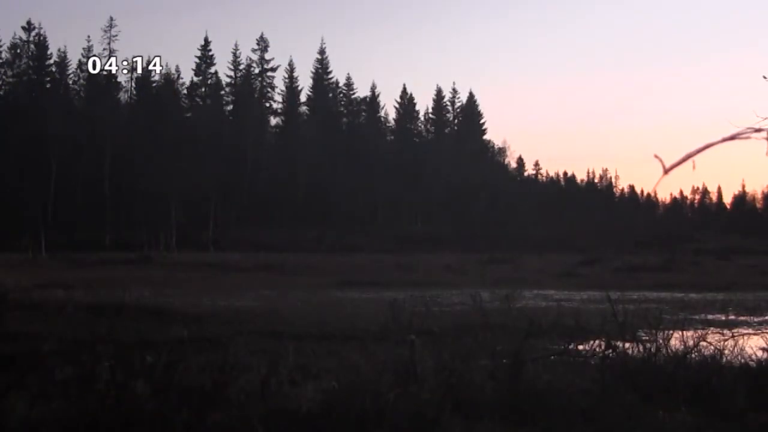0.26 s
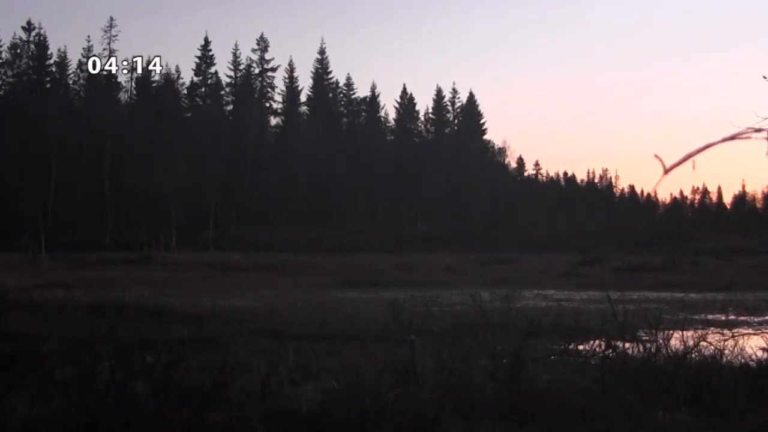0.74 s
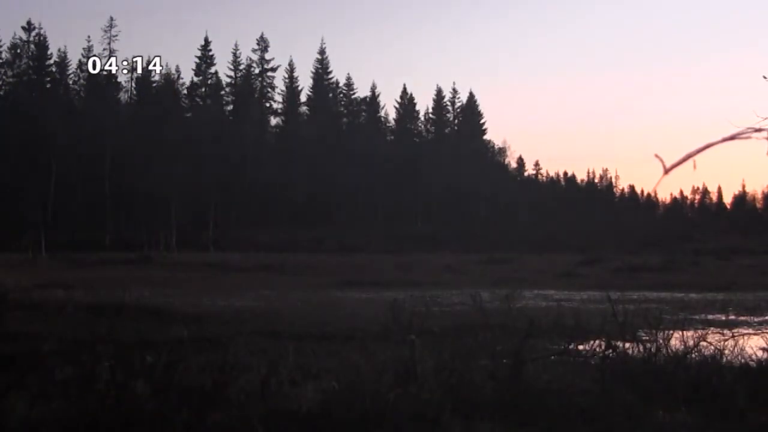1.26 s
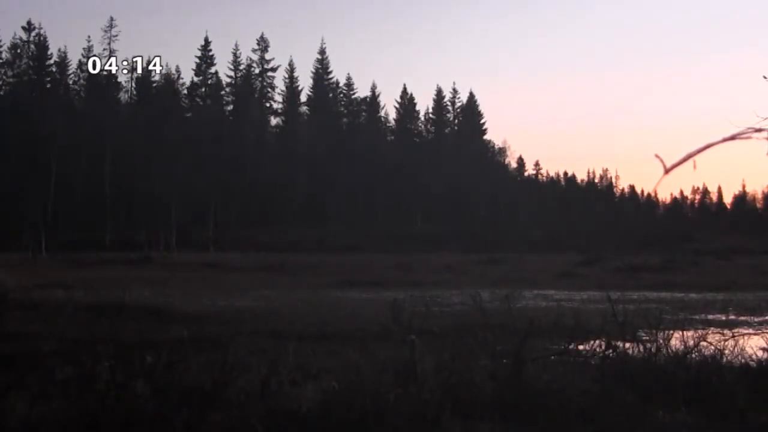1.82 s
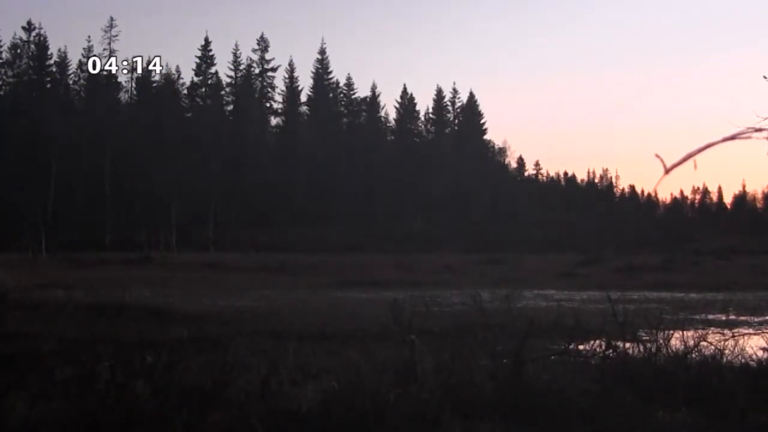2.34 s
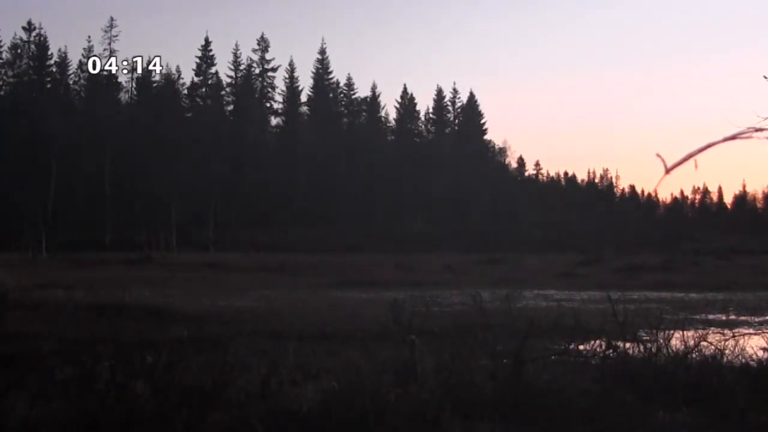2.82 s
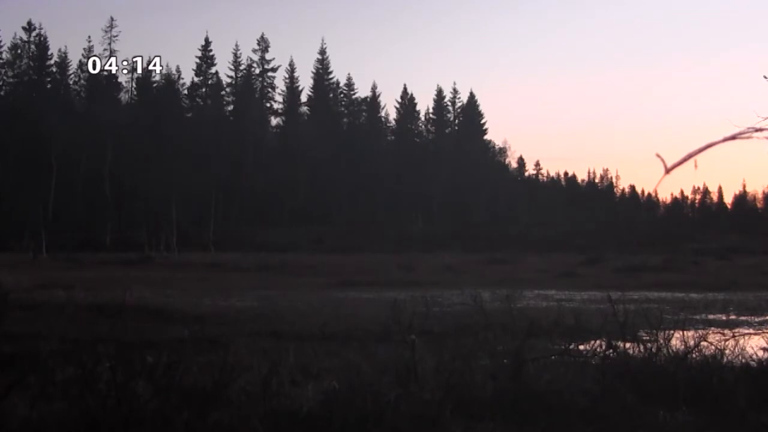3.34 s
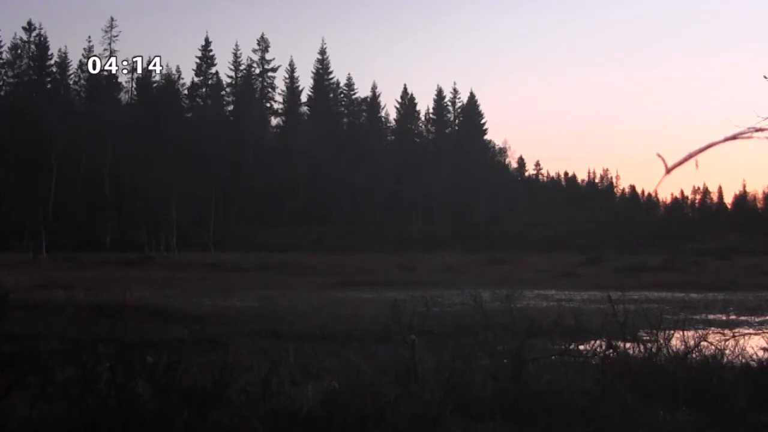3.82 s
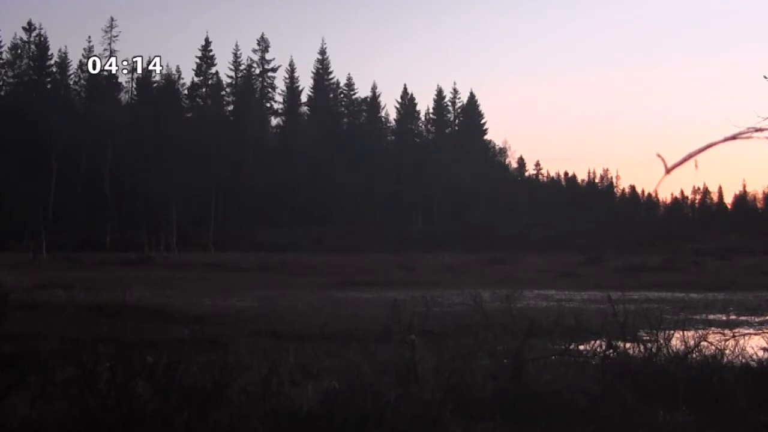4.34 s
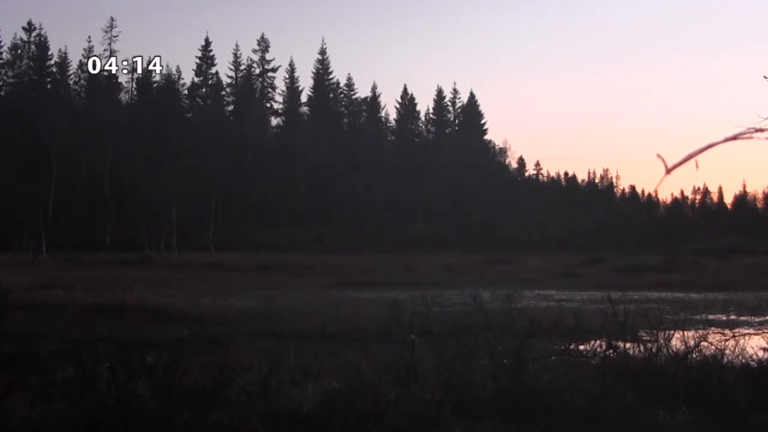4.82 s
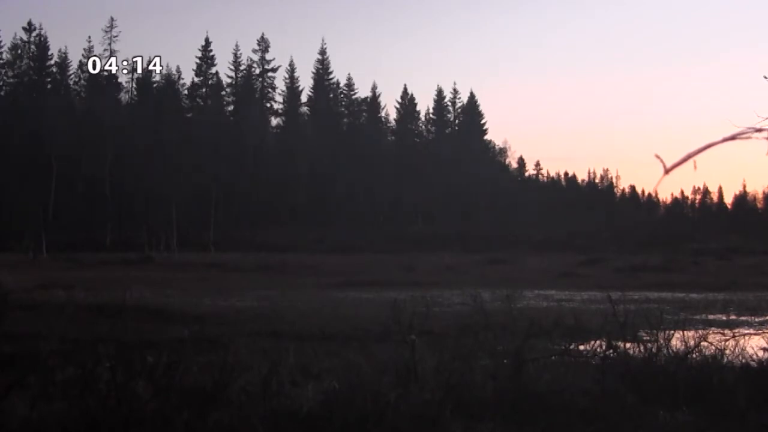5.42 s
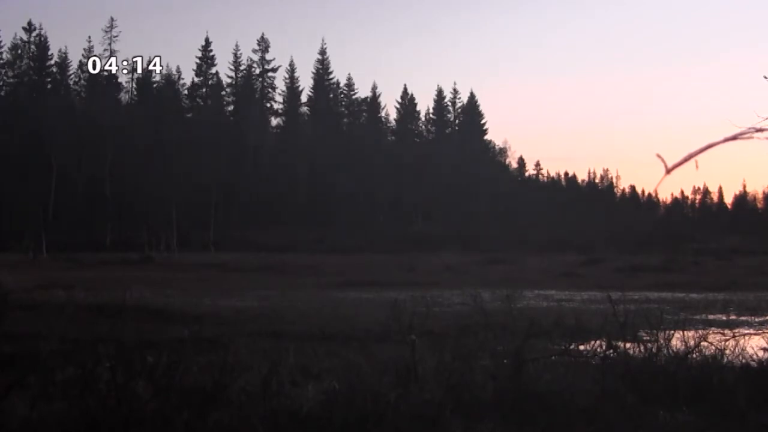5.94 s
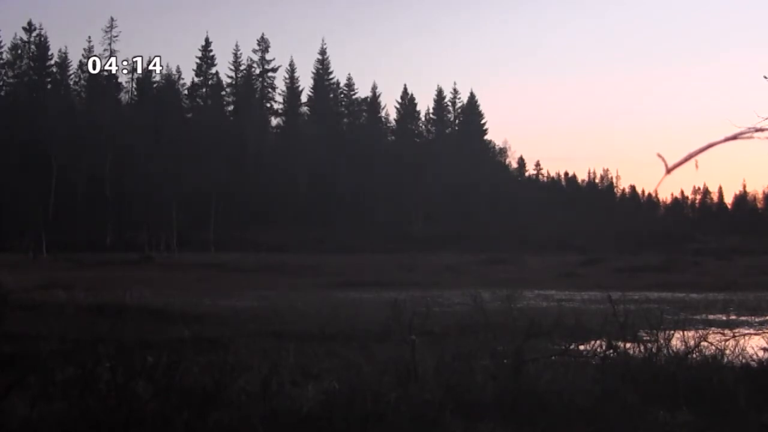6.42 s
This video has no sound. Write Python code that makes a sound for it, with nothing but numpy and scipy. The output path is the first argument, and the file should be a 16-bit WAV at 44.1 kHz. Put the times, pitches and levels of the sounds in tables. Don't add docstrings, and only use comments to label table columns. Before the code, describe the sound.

Many birds call over an open bog at daybreak, with clear whistles, faint low bubbling coos, one airy hiss, sharp chatter and late hoarse croaks.

```python
import sys
import numpy as np
from scipy import signal
from scipy.io import wavfile
from scipy.ndimage import uniform_filter1d

SR = 44100
rng = np.random.default_rng(int(sys.argv[2]) if len(sys.argv) > 2 else 0)


def int16_out(signal):
    q = np.round(np.clip(np.atleast_2d(signal).T, -1, 1) * 32767)
    wavfile.write(sys.argv[1], SR, q.astype(np.int16))


def nominal_scale(level):
    x = np.asarray(level, float) / 20
    return 10 ** x


N = 294147

# pitch in Hz, time to fall by 60 dB in seconds.
ECHO_TIMES = [(500, 1.8), (2000, 1.32), (4000, 0.91), (8000, 1.1)]


def evened(x):
    return x / np.sqrt(np.mean(x ** 2) + 1e-20)


def read(points, hz):
    f, value = np.transpose(points)
    return np.interp(np.log(hz + 1), np.log(f + 1), value)


def add(mix, s, sound, pan_db=0., lag=0.):
    for ch, sign in enumerate((1, -1)):
        at = s * SR + sign * lag / 2
        first = int(np.floor(at))
        between_samples = np.sinc(np.arange(-8, 9) - (at - first)) * np.hanning(17)
        shifted = np.convolve(sound, between_samples)[max(8 - first, 0):]
        same_power = np.sqrt(np.cosh(pan_db * np.log(10) / 20))
        shifted = shifted * nominal_scale(sign * pan_db / 2) / same_power
        part = mix[ch, max(first - 8, 0):][:len(shifted)]
        part += shifted[:len(part)]


def resonate(x, hz, width):
    turn = np.exp(2j * np.pi * np.cumsum(hz * np.ones(len(x))) / SR)
    r = np.exp(-np.pi * width / SR)
    return 2 * (turn * signal.lfilter([(1 - r) ** 2], [1, -2 * r, r * r], x / turn)).real


def drift(size, span):
    noise = rng.standard_normal(size + 2 * span)
    return evened(uniform_filter1d(uniform_filter1d(noise, span), span))[:size]


def tone(hz, level_db, fade):
    wave = np.sin(2 * np.pi * np.cumsum(hz) / SR)
    return np.sqrt(2) * nominal_scale(level_db) * wave * signal.windows.tukey(len(hz), fade)


def whistles(mix):
    # start in seconds, length in seconds, first Hz, goal Hz, top level in dB, pitch and level shape.
    left_notes = [(0.0, .135, 1604, 1866, -32.5, "settle early"),
                  (0.259, 0.011, 1910, 2610, -28.5, "glide swell"),
                  (0.296, 0.0091, 2650, 1950, -30, "glide bloom"),
                  (0.431, 0.0131, 3950, 2545, -31, "hook bloom"),
                  (0.607, 0.085, 3680, 3030, -39.5, "ease crest"),
                  (0.688, 0.185, 2930, 3090, -37.5, "ease early trill"),
                  (3.882, .11, 1968, 1870, -37, "sweep bloom"),
                  (4.542, 0.11, 1570, 1693, -39.5, "settle early"),
                  (6.081, 0.092, 1920, 1875, -31, "glide fade"),
                  (6.337, 0.11, 1672, 1540, -39.5, "glide even"),
                  (6.446, 0.12, 2004, 2130, -41.5, "sweep swell"),
                  (6.534, 0.062, 2760, 2720, -40, "glide even"),
                  (6.173, 0.13, 2056, 2110, -42, "glide even trill"),
                  (6.53, .08, 2128, 2150, -38.5, "glide fade")]
    right_notes = [(.283, 0.021, 3900, 2820, -26.5, "hook bloom"),
                   (0.307, 0.039, 2930, 3360, -33.5, "vault fade"),
                   (0.488, 0.087, 1865, 1448, -42.5, "glide fade"),
                   (.553, 0.083, 1457, 1905, -31.5, "settle crest"),
                   (0.641, 0.04, 1943, 1800, -34, "glide fade trill"),
                   (.63, 0.091, 1570, 1490, -53, "glide even"),
                   (.862, 0.14, 2460, 2182, -30.5, "rise late"),
                   (0.868, 0.12, 2740, 2900, -30.5, "arch crest"),
                   (1.257, .025, 2172, 1875, -29.5, "glide swell"),
                   (1.285, .085, 1860, 1950, -41, "glide even trill"),
                   (1.318, 0.062, 2620, 2505, -39, "glide bloom"),
                   (1.37, 0.087, 2026, 1979, -26, "arch even"), (1.499, .14, 2420, 2874, -27, "rise bloom"),
                   (2.387, 0.021, 3900, 2750, -27.5, "glide swell"),
                   (2.415, 0.052, 3365, 2990, -32.5, "hook early"),
                   (2.513, 0.1, 2200, 2946, -26, "ease swell"),
                   (3.69, 0.093, 2510, 2990, -29.5, "glide late"),
                   (2.611, 0.0073, 2940, 2400, -37, "glide fade"),
                   (3.662, 0.05, 2700, 2680, -43, "glide even trill"),
                   (4.764, 0.042, 2886, 3110, -37, "vault bloom"),
                   (4.77, .11, 2366, 1677, -36.5, "glide even"),
                   (5.55, 0.12, 1848, 1807, -40.5, "glide bloom"),
                   (5.635, 0.09, 1470, 1930, -40.5, "sweep swell")]
    ahead_notes = [(1.742, 0.11, 1497, 1935, -36.5, "hook even trill"),
                   (1.9, 0.19, 2100, 2123, -34.5, "arch even trill"),
                   (1.855, 0.047, 1854, 2090, -36.5, "glide swell"),
                   (1.875, 0.227, 2470, 2396, -41, "glide even trill"),
                   (1.985, 0.052, 2134, 1480, -31, "ease snap"),
                   (2.116, 0.11, 2905, 2787, -24.5, "settle even"),
                   (2.279, 0.078, 2750, 2770, -33.5, "glide even"),
                   (2.316, 0.069, 2490, 2500, -29.5, "glide swell"),
                   (2.699, 0.0096, 3960, 4400, -28, "ease swell"),
                   (2.707, 0.035, 4400, 3130, -33, "ease even"),
                   (2.742, 0.3, 3110, 4344, -32.5, "vault even"),
                   (3.255, 0.235, 2410, 2300, -44, "droop early"),
                   (3.478, 0.172, 2260, 3510, -33.5, "curl swell"),
                   (3.565, 0.086, 4480, 3094, -37.5, "hook bloom"),
                   (3.57, 0.16, 2030, 2133, -41.5, "vault swell trill"),
                   (3.553, 0.028, 3800, 2437, -38, "glide crest"),
                   (3.592, 0.028, 4200, 4030, -43, "hook even"),
                   (3.697, .045, 4300, 4010, -44.5, "ease bloom"),
                   (3.87, 0.016, 4340, 4330, -38.5, "glide even"),
                   (3.982, 0.085, 4010, 4250, -35.5, "ease bloom"),
                    (4.062, 0.115, 4250, 3830, -34.5, "rise even"),
                    (4.0, .04, 4100, 3700, -36, "rise fade"), (4.144, .024, 4780, 4290, -36.5, "ease even"),
                    (4.165, 0.11, 4290, 3930, -34, "rise early"),
                    (4.1, .022, 4800, 4450, -43, "glide even"),
                    (4.955, 0.082, 2360, 2020, -40, "droop even"),
                    (4.89, .06, 2440, 2300, -39, "droop swell"),
                    (4.8, 0.12, 2300, 2360, -43, "glide even trill"),
                    (5.46, 0.087, 2520, 2560, -45, "glide even trill"),
                    (.946, 0.053, 4420, 4400, -44, "glide fade"),
                    (5.018, 0.055, 2520, 2400, -41, "glide swell"),
                    (5.09, 0.205, 2167, 2077, -37, "ease fade"),
                    (5.095, .045, 3300, 4500, -41, "glide crest"),
                    (5.37, 0.085, 2620, 2380, -39.5, "sweep late"),
                    (5.29, .23, 2090, 2080, -47.5, "glide even"),
                    (5.625, .065, 2340, 2190, -44, "ease even"), (5.51, .05, 1880, 1850, -46, "glide even"),
                    (5.06, .09, 1760, 1740, -48, "glide even")]
    # left-right level in dB, left delay in samples.
    places = [(13.5, 2.5), (-15, 0), (-3, -3.5)]
    pitch_shapes = {"glide": (1, 1, 0), "ease": (1, 1.9, 0), "sweep": (1, .7, 0), "settle": (.3, 1.5, .05),
                    "hook": (.45, 1.4, .3), "vault": (.48, 2.1, .62), "arch": (.5, 2, 1.1),
                    "curl": (.76, 1.2, .25), "droop": (1, .35, 0), "rise": (1, .5, 0)}
    level_shapes = {"swell": (0.86, -13.5, -.3), "bloom": (0.34, -10.5, -0.6), "crest": (0.38, -14, -4),
                    "early": (0.16, -6.5, -1.5), "even": (0.43, -4, -3), "fade": (0.038, -.3, -11),
                    "late": (0.6, -12, -8), "snap": (0.013, -.3, -16.5)}
    trill_per_s, trill_swing, trill_db = 46, .025, 1.5

    for notes, (pan_db, lag) in zip((left_notes, right_notes, ahead_notes), places):
        for s, length, hz0, hz1, db, shape in notes:
            turn, bend, back = pitch_shapes[shape.split()[0]]
            top, db0, db1 = level_shapes[shape.split()[1]]
            u = np.linspace(0, 1, int(length * SR), endpoint=False)
            going = 1 - np.maximum(1 - u / turn, 0) ** bend
            returning = back * (np.maximum(u - turn, 0) / (1.001 - turn)) ** bend
            level_db = db + np.interp(u, [0, top, 1], [db0, 0, db1])
            far = np.clip((-28 - level_db) / 12, .2, 1)
            pitch = hz0 + (hz1 - hz0) * (going - returning)
            pitch = pitch * (1 + .008 * far * drift(len(u), 170))

            beat = np.cos(2 * np.pi * trill_per_s * length * u + 1.14 * drift(len(u), 900))
            beat = beat * ("trill" in shape) * np.minimum(4 * u, 1)
            pitch = pitch * (1 + trill_swing * beat)
            flutter_db = 3.0 * far * drift(len(u), 230)
            level_db = level_db + trill_db * beat + flutter_db

            fade_s = .003 + 0.013 * np.clip((-31.5 - db) / 10, 0, 1) * min(length / .1, 1)
            add(mix, s, tone(pitch, level_db, min(fade_s / length, 1)), pan_db, lag)


def bubbles(rows, start=0., gain_db=0.):
    bends = {"sink": (1.04, .96, .77), "drop": (1.11, 1, .79), "arch": (.88, 1, .8), "pip": (.88, 1, 1.08),
             "coo": (.97, 1, 1.01)}
    out = np.zeros((2, N))
    for s, length, hz, db, shape in rows:
        u = np.linspace(0, 1, int(length * 1.2 * SR))
        pitch = hz * np.polyval(np.polyfit([0, .5, 1], bends[shape], 2), u)
        level_db = db + gain_db + 1.5 * drift(len(u), 300)
        add(out, start + s - length / 8, tone(pitch, level_db, .7))
    return out[0]


def falling(rows):
    return [(*row, "sink") for row in rows]


def near_cock():
    # start within the phrase in seconds, length in seconds, pitch in Hz, level in dB, shape.
    phrase = [(0, .065, 670, -56, "arch"), (.128, 0.051, 651, -52, "drop"), (.24, 0.076, 662, -53, "arch"),
              (.33, 0.061, 597, -52, "arch"), (.41, 0.057, 662, -52, "arch"),
              (.46, 0.098, 629, -55.5, "coo"), (.545, 0.041, 592, -51, "drop"),
              (.65, .041, 645, -59, "sink"), (.68, 0.038, 558, -57.5, "pip"),
              (.74, 0.016, 630, -51.5, "pip"), (.765, 0.033, 606, -49.5, "drop"),
              (.835, 0.028, 648, -50.5, "drop"), (.915, 0.071, 634, -49.5, "sink"),
              (1.0, 0.049, 598, -50.5, "arch"), (1.055, 0.013, 640, -50.5, "pip"),
              (1.08, .045, 632, -49, "drop"), (1.19, 0.039, 583, -59, "arch"),
              (1.24, 0.028, 647, -61, "arch"), (1.275, 0.027, 640, -55, "sink"),
              (1.31, .038, 600, -65, "sink")]
    # start in seconds, level change in dB.
    phrase_starts = [
        (-.16, 1.5),
        (4.295, -1.5),
    ]
    # start in seconds, length in seconds, top pitch in Hz, level in dB.
    loose = [(3.62, 0.07, 587, -57.5), (3.71, 0.05, 574, -56.5), (3.78, 0.032, 613, -55.5),
             (3.835, 0.051, 615, -52.5), (3.905, 0.0608, 629, -50.5), (3.975, .045, 678, -53),
             (4.04, 0.033, 690, -54.5)]
    sound = bubbles(falling(loose)) + sum(bubbles(phrase, s, db) for s, db in phrase_starts)
    return sound * np.array([[1.4], [-.28]])


def forest_edge(x):
    taps = np.zeros((2, SR))
    at = np.arange(400, SR - 20, 20) + rng.integers(0, 20, (2, (SR - 401) // 20))
    np.put_along_axis(taps, at, rng.choice([-1., 1.], at.shape), 1)
    hz, t, z = signal.stft(taps, SR, nperseg=256)
    dying = nominal_scale(-60 * t / read(ECHO_TIMES, hz)[:, None])
    tail = signal.istft(z * dying, SR, nperseg=256)[1]
    tail[1] += 0.37 * tail[0]
    tail = tail / np.linalg.norm(tail, axis=1, keepdims=True)
    return signal.fftconvolve(x[None], tail, axes=1)[:, :N]


def blurs():
    # start in seconds, length in seconds, pitch in Hz, level in dB.
    thin_calls = [(.93, 0.026, 4630, -48.5), (1.218, 0.039, 4020, -44), (1.59, 0.03, 3400, -45),
                  (1.92, 0.2, 5240, -55.5), (1.987, 0.071, 4420, -50.5), (3.03, 0.16, 4330, -44),
                  (3.105, 0.16, 1915, -49), (3.15, 0.37, 3460, -45.5), (0.27, 0.29, 2320, -44.5),
                  (0.091, 0.06, 6500, -54.5), (0.074, .08, 7600, -57), (0.8, .17, 10800, -63),
                  (3.36, 0.074, 7200, -58), (2.85, 0.24, 10700, -62), (4.995, 0.05, 4300, -46),
                  (5.08, 0.068, 1810, -49), (6.61, .06, 5000, -49), (0.99, 0.091, 5100, -56),
                  (5.77, 0.081, 5270, -53), (4.2, .017, 4150, -47.5), (3.63, 0.42, 2700, -47.5),
                  (4.089, 0.036, 4570, -46.5), (4.804, 0.046, 3400, -45.5), (5.395, 0.076, 2410, -41.5),
                  (2.85, .25, 5200, -53), (5.5, .06, 5500, -55), (3.9, .1, 3400, -47),
                  (6.187, 0.074, 4040, -43.5), (6.412, 0.16, 4250, -45.5)]
    harsh_calls = [(6.1, 0.21, 1400, -49.5), (1.25, .3, 4900, -55.5), (4.45, .3, 1300, -54),
                   (0.199, 0.18, 3200, -45.5), (1.15, 0.51, 2820, -46.5), (1.992, 0.016, 2700, -39.5),
                   (2.3, 0.43, 2820, -40), (2.737, .29, 3240, -37), (4.071, 0.23, 1200, -53.5),
                   (4.995, 0.03, 3700, -39.5), (5.9, 0.17, 3500, -41.5), (6.52, 0.077, 3100, -41.5)]
    # start in seconds, length in seconds, level in dB.
    hisses = [
        (2.173, 0.47, -33.5),
        (4.432, 0.21, -42),
        (5.936, 0.27, -46.5),
    ]
    # pitch in Hz, half width in Hz, level in dB.
    mouth = [(5110, 1020, 0), (7050, 895, -13), (9330, 915, -18.5), (3650, 705, -8), (1650, 480, -9.5),
             (5300, 260, -7)]
    thin_width, harsh_width = 0.056, 0.23
    gape_from, gape_for = 0.15, 0.63

    rows = [(s, n, hz, hz * thin_width, db) for s, n, hz, db in thin_calls]
    rows += [(s, n, hz, hz * harsh_width, db) for s, n, hz, db in harsh_calls]
    for s, n, db in hisses:
        for k, (hz, width, gain_db) in enumerate(mouth):
            side = k > 0
            rows.append((s + side * gape_from * n, n * gape_for ** side, hz, width, db + gain_db))
    return rows


def background():
    # time in seconds, level in dB.
    murmur = [(0, -51), (1.0, -57), (2.5, -51), (3.0, -58), (3.5, -62.5), (4.0, -76), (4.3, -63),
              (5.0, -58.5), (5.7, -62), (6.1, -55), (6.67, -59)]
    forest_song = [(0, -37.5), (1.0, -41.5), (1.3, -41), (2.1, -36.5), (2.5, -35), (3.0, -70), (3.9, -59),
                   (4.5, -35), (4.999, -44), (5.7, -38.5), (6.1, -42.5), (6.67, -35.5)]
    thin_song = [(0, -43), (1.0, -46), (2.0, -48), (3.3, -47.5), (4.2, -44.5), (5.1, -41), (5.4, -57),
                 (5.8, -46.5), (6.1, -45.5), (6.67, -47.5)]
    rustle = [(1.0, -61), (1.3, -54), (3.0, -54.5), (3.9, -61), (4.5, -71), (5.1, -57), (5.7, -56.5),
              (6.67, -49)]
    # pitch in Hz, half width in Hz.
    source_bands = [(1150, 275), (2050, 336), (3150, 530), (14300, 1200)]
    # pitch in Hz, level in dB.
    noise_color = [(60, -68), (200, -50.5), (300, -12.5), (420, -37.5), (520, -7), (900, -5), (2000, -10.5),
                   (5000, -5.5), (8000, -7.5), (16000, -11.5)]
    noise_db = -51
    # pitch in Hz, likeness of left and right (1 is equal).
    likeness = [(200, 0.076), (1000, 0.31), (2400, 0.9), (4400, 0.27), (6500, 0.24), (9000, 0.21),
                (15000, -0.067)]

    frames, hz = N // 128 + 5, np.fft.rfftfreq(512, 1 / SR)
    t = np.arange(frames) * 128 / SR
    a, b, c, d, patches = rng.standard_normal((frames, 257, 5)).T
    patches = evened(uniform_filter1d(uniform_filter1d(patches, 3, 0), 30, 1))

    bands = list(source_bands)
    levels = []
    for curve in (murmur, forest_song, thin_song, rustle):
        levels.append(nominal_scale(np.interp(t, *np.transpose(curve)) - 3.0))
    for s, length, f, width, db in blurs():
        swell = np.clip((t - s) / (0.0067 + 0.25 * length), 0, 1)
        dying_db = 60 * np.maximum(t - s - length, 0) / (1.32 * read(ECHO_TIMES, f))
        levels.append(swell * nominal_scale(db - dying_db))
        bands.append((f, width))

    shapes = [np.exp(-abs((hz - f) / w) ** 2.3) for f, w in bands]
    power = sum(np.outer(g / g.sum(), level ** 2) for g, level in zip(shapes, levels))
    power = power * nominal_scale(2 * 2.2 * patches)
    floor = nominal_scale(2 * read(noise_color, hz))
    power += (nominal_scale(2 * noise_db) * floor / floor.sum())[:, None] * nominal_scale(2 * 0.84 * patches)

    same = np.clip(read(likeness, hz), -1, 1)[:, None]
    late = np.exp(-2j * np.pi * hz * 3.1 / SR)[:, None]
    left = a + 1j * b
    right = same * late * left + np.sqrt(1 - same ** 2) * (c + 1j * d)
    z = np.array([left, right]) * np.sqrt(power)
    return 0.98 * signal.istft(z, nperseg=512, noverlap=384)[1][:, :N]


def chips(mix):
    # start in seconds, length in seconds, first Hz, last Hz, level in dB.
    chip_notes = [(.219, .01, 2750, 3450, -41), (.228, .005, 3400, 2900, -37),
                  (.232, .008, 2850, 3400, -35), (.238, .008, 3400, 3900, -44),
                  (.255, .01, 3300, 3100, -41), (.406, .01, 2690, 3100, -38), (.443, .006, 2600, 2100, -38),
                  (.452, .012, 2900, 2950, -40), (.475, .01, 2850, 2600, -40), (.79, .012, 2750, 2500, -39),
                  (.8, .012, 2300, 2600, -37), (1.455, .012, 3000, 3200, -42),
                  (1.615, .015, 3400, 3200, -40), (2.024, .018, 2800, 3280, -37),
                  (2.305, .015, 2000, 1980, -33), (2.378, .008, 2800, 3350, -37),
                  (3.896, .02, 3250, 3330, -39), (3.478, .016, 2300, 2280, -40),
                  (4.058, .034, 2660, 2200, -44), (5.025, .012, 3000, 3100, -40),
                  (5.675, .07, 2150, 2330, -37.5), (6.148, .013, 3500, 2580, -42),
                  (6.204, .01, 3200, 2600, -42), (6.305, .01, 3400, 2700, -42),
                  (6.31, .012, 4100, 3800, -45), (6.253, .012, 3450, 2750, -42)]
    for s, length, hz0, hz1, db in chip_notes:
        pitch = np.linspace(hz0, hz1, int(length * SR))
        rough = 1 + 0.029 * drift(len(pitch), 60)
        add(mix, s, tone(pitch * rough, db, 0.27), -4, -2.0)


def warbles(mix):
    # start in seconds, end in seconds, warbles per second, level in dB, left-right level in dB.
    warble_notes = [
        (4.155, 4.415, 33.3, -30, -3),
        (.67, .853, 43.7, -33, 2),
    ]
    # pitch in Hz at start and at end, swing in Hz at start and at end.
    pitch_swings = [(2130, 2210, 700, 90), (1950, 2200, 560, 480)]
    gap_depths = [(1, .15, .04), (1, 1, 0)]
    for note, swings, depths in zip(warble_notes, pitch_swings, gap_depths):
        s0, s1, rate, db, pan_db = note
        hz0, hz1, swing0, swing1 = swings
        gap0, gap1, slowing = depths
        left = np.linspace(1, 0, int((s1 - s0) * SR))
        arch = abs(np.sin(np.pi * rate * (s1 - s0) * (left + slowing * left ** 3)))
        swing = swing1 + (swing0 - swing1) * left ** 2
        pitch = hz1 + (hz0 - hz1) * left + swing * (arch - .7)
        gaps = 1 - (gap1 + (gap0 - gap1) * left) * (1 - arch ** 2)
        level_db = db - 15 * left ** 6.5 - 2.5 + 0.78 * drift(len(left), 300)
        add(mix, s0, gaps * tone(pitch, level_db, 0.065), pan_db, pan_db / 2)


def far_cock():
    # start in seconds, length in seconds, top pitch in Hz, level in dB.
    far_bubbles = [(1.31, .04, 588, -72), (1.4, 0.032, 520, -70), (1.465, 0.039, 558, -68),
                   (1.535, .045, 550, -70), (1.925, 0.036, 598, -70), (2.0, 0.029, 575, -71),
                   (2.075, 0.033, 560, -71), (2.14, .04, 570, -68), (2.52, .035, 640, -71),
                   (3.04, .035, 540, -71), (3.11, .03, 558, -67), (2.215, 0.044, 615, -62.5),
                   (2.285, .045, 617, -61.5), (2.36, .04, 611, -63), (2.42, .04, 634, -64),
                   (2.7, 0.074, 631, -67), (2.83, 0.037, 635, -67), (2.97, 0.025, 594, -63.5),
                   (3.13, 0.09, 653, -63), (3.235, .04, 611, -63.5), (3.47, .045, 583, -64),
                   (3.535, 0.04, 595, -68), (5.845, .035, 530, -69), (5.92, .04, 523, -71),
                   (5.99, .04, 560, -65), (6.41, .04, 562, -68), (6.475, 0.0395, 554, -70),
                   (6.545, 0.034, 547, -68), (6.62, 0.031, 550, -66)]
    return bubbles(falling(far_bubbles)) * nominal_scale(np.array([[3.0], [.5]]))


def chatter(mix):
    # start in seconds, gap to main stroke in seconds, lead, main and last stroke in dB.
    scolds = [
        (4.417, .019, -21, -17, -20),
        (4.522, .021, -16.5, -14, -21),
        (4.638, .021, -17.5, -14, -20.5),
    ]
    # pitch in Hz, width in Hz, level in dB.
    beak = [(2296, 80, -7.5), (2750, 540, -1.5), (3500, 140, -8), (4400, 740, 2.5), (5370, 205, -9)]
    rises = (0.005, 0.0066, 0.0054)
    t = np.arange(1300) / SR
    for s, gap, *strokes_db in scolds:
        for late, rise, db in zip((0, gap, gap + 0.015), rises, strokes_db):
            puff = rng.standard_normal(len(t)) * ((t / rise) * np.exp(1 - t / rise)) ** 2
            sound = sum((-1) ** k * nominal_scale(gain_db) * evened(resonate(puff, f, w))
                        for k, (f, w, gain_db) in enumerate(beak))
            add(mix, s + late, nominal_scale(db) * sound / abs(sound).max(), -6.5, -3.5)


def croak(rows, rate, opening, bright_db):
    # pitch in Hz, width in Hz, level in dB.
    hollows = [(1747, 173, 6), (2185, 300, -1), (2820, 140, -17.5), (3840, 800, -21), (5320, 99, -35)]
    easy_db, open_per_db = -24, .009
    dull_at, dull_db = 0.42, -7

    s, db = np.transpose(rows)
    t = np.arange(s[0], s[-1], 1 / SR)
    effort_db = np.interp(t, s, db)
    beak = opening + open_per_db * (effort_db - easy_db)
    dullness = np.exp(-((np.linspace(0, 1, len(t)) - dull_at) / 0.29) ** 2)
    upper_db = bright_db + dull_db * dullness

    turns = np.cumsum(rate * (1 + .2 * drift(len(t), 150))) / SR
    pulses = np.diff(np.floor(turns), prepend=0) * nominal_scale(1.8 * drift(len(t), 150))
    puffs = (0.55 + np.exp(-(turns % 1) / 1.4)) * rng.standard_normal(len(t))
    drive = evened(pulses) + .8 * evened(puffs)

    throat = np.zeros(len(t))
    for k, (f, width, gain_db) in enumerate(hollows):
        ringing = evened(resonate(drive, f * beak ** (1 / (1 + k)), width))
        throat += (-1) ** k * nominal_scale(gain_db + (k > 0) * upper_db) * ringing
    throat /= np.sqrt(uniform_filter1d(throat ** 2, 800))
    return s[0], nominal_scale(effort_db) * throat * signal.windows.tukey(len(t), .03)


def hoarse_bird(mix):
    # time in seconds, effort in dB.
    calls = [
        [(5.726, -36), (5.748, -19.5), (5.762, -15), (5.8, -19), (5.85, -22.5), (5.885, -28.5), (5.97, -19.5),
         (6.005, -17.5), (6.04, -25), (6.076, -23)],
        [(6.558, -37), (6.571, -23), (6.61, -22.5), (6.645, -23), (6.67, -24.5)],
    ]
    # pulses per second, beak opening as a factor on the throat, upper resonances in dB.
    voices = [(167.1, 0.95, 7), (164.2, 0.914, -11)]
    for rows, voice in zip(calls, voices):
        add(mix, *croak(rows, *voice), 4.5, 4.0)


def scene():
    birds, hoarse = np.zeros((2, 2, N))
    whistles(birds)
    cocks = near_cock()
    chips(birds)
    warbles(birds)
    cocks += far_cock()
    chatter(birds)
    hoarse_bird(hoarse)
    throats = signal.butter(4, 1100, "highpass", fs=SR, output="sos")
    birds, hoarse = signal.sosfilt(throats, [birds, hoarse])

    song_echo_db, bog_echo_db = -14.5, -19
    to_forest = nominal_scale(song_echo_db) * birds.sum(0) + nominal_scale(bog_echo_db) * (hoarse + cocks).sum(0)
    return birds + hoarse + cocks + forest_edge(to_forest) + background()


def roll_off(x):
    return signal.sosfilt(signal.butter(12, 15790, fs=SR, output="sos"), x)


def record(dry):
    power = uniform_filter1d(uniform_filter1d(dry[0] ** 2, 60), 60)
    swing = np.sqrt(2 * abs(power))
    limited = dry / (1 + (swing / .36) ** 4) ** .25
    low_cut = signal.butter(2, 300, "highpass", fs=SR, output="sos")
    return roll_off(signal.sosfilt(low_cut, limited))


dry = scene()
out = record(dry)
int16_out(out)
```